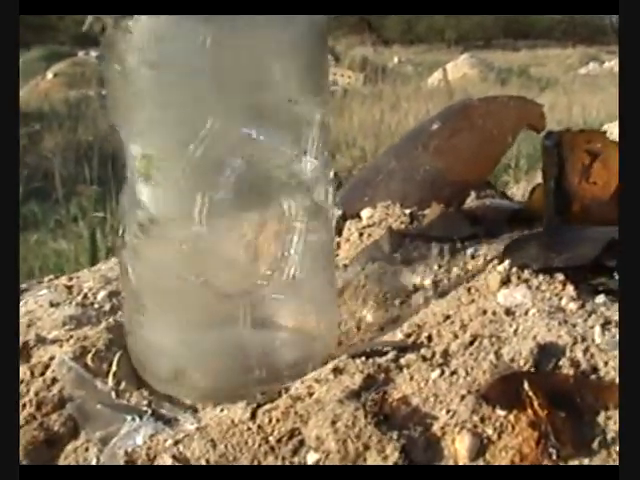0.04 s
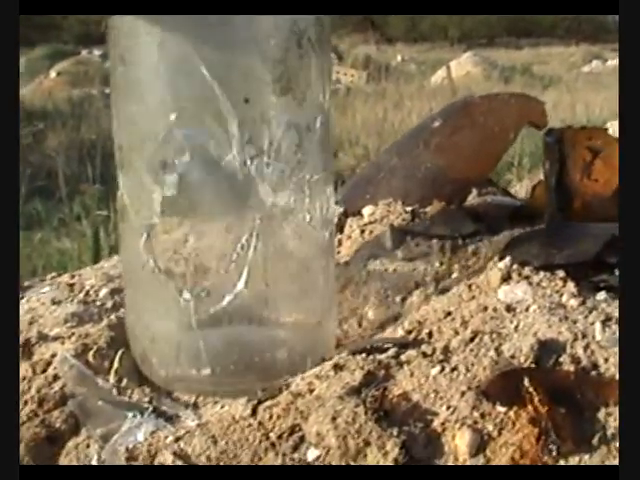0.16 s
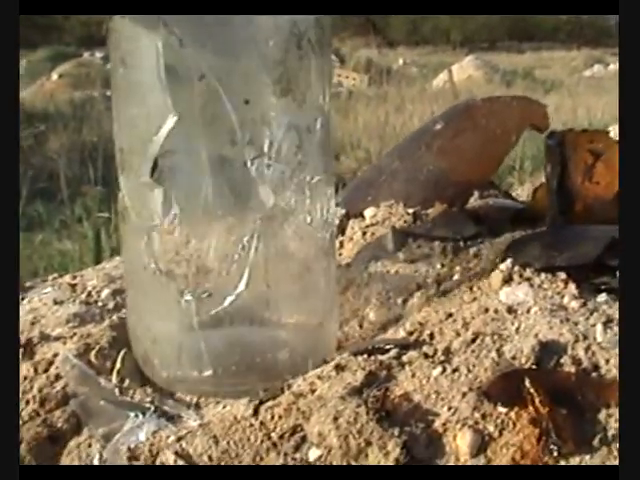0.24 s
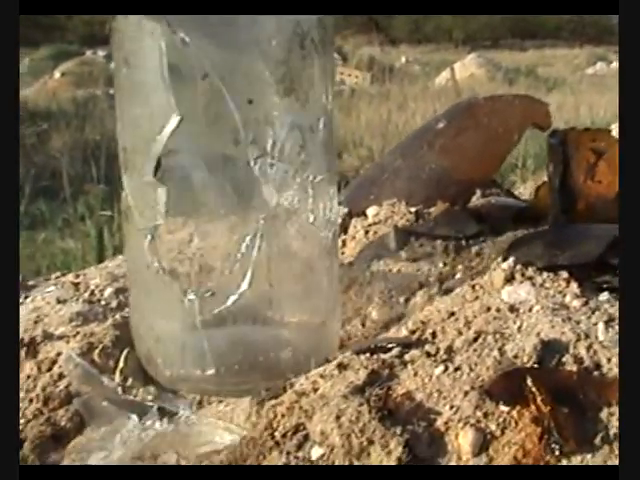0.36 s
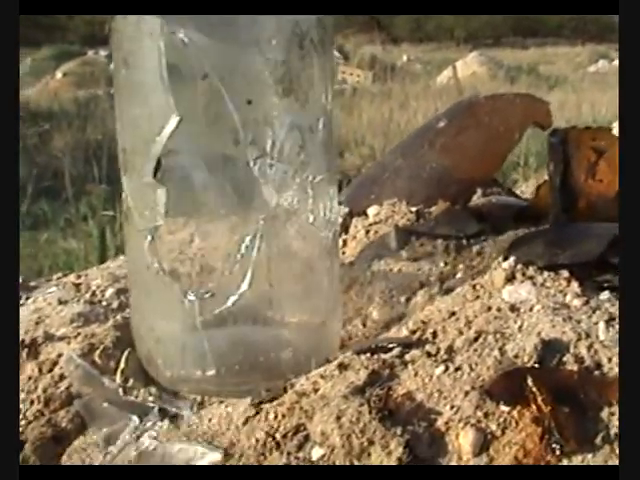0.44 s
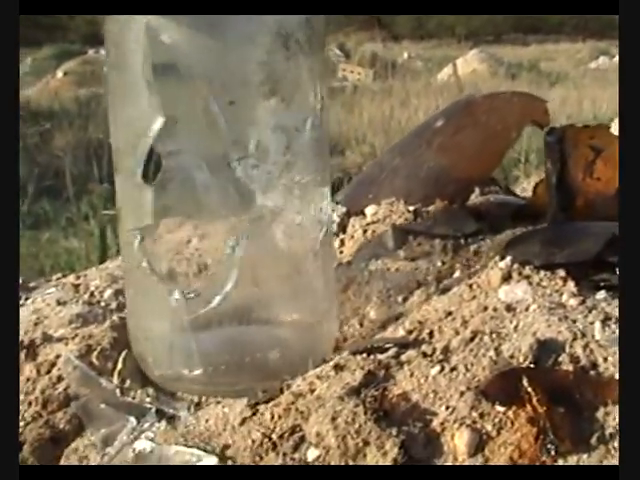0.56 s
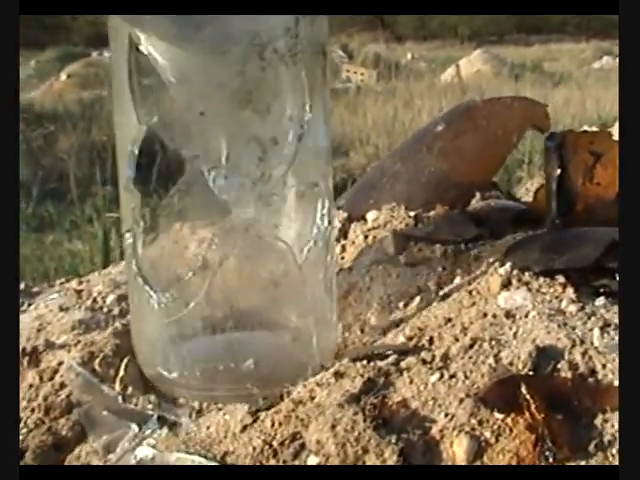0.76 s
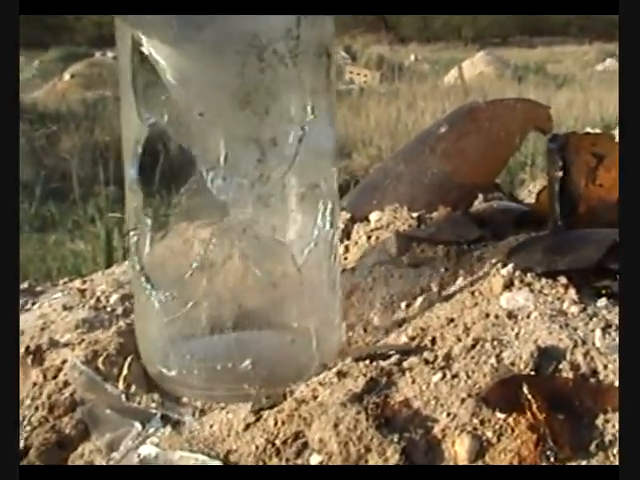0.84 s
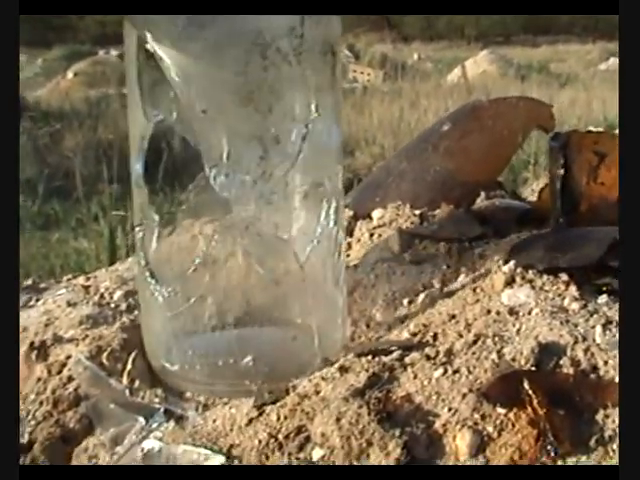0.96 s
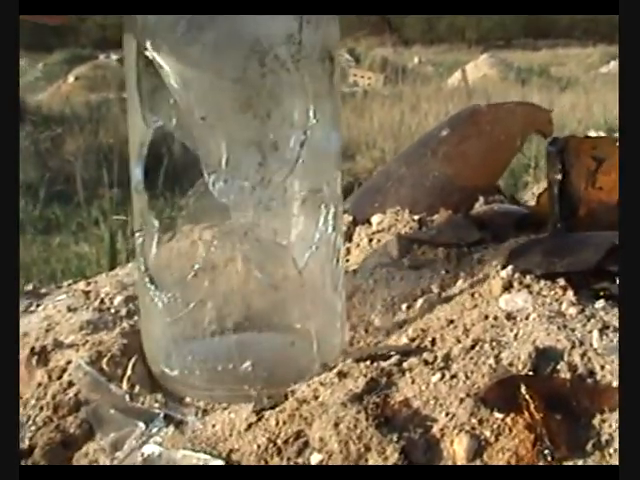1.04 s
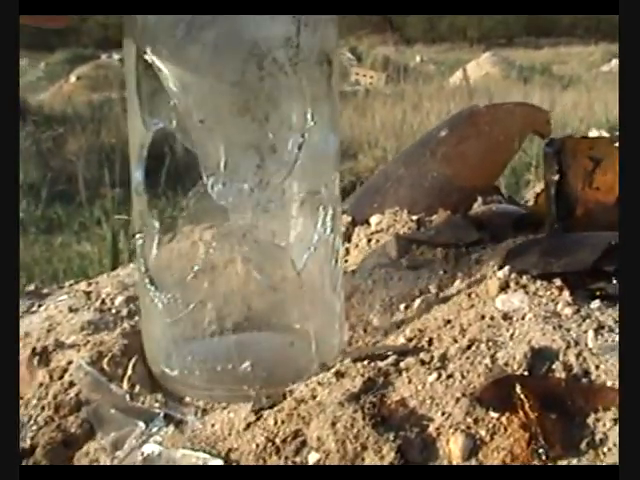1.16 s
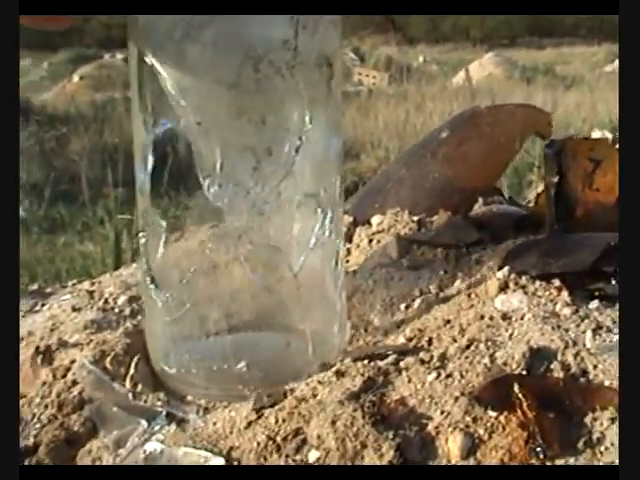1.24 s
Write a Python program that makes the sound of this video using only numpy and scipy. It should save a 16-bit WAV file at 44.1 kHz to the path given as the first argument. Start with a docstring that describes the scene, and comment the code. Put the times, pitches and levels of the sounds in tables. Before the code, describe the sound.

Cracked glass jar shifts on a gritty heap, knocking hollowly and crunching before its edges crack, squeak and snap hard; small scrapes and ticks follow. Close microphone in open air, no echo, very faint wind rumble.

```python
"""Cracked glass jar ground into sand

A cracked glass jar is pressed and turned on a heap of sand outdoors, close by and a little to the left.
Clicks and grinding ring its hollow modes; its edges crack in noise bursts, squeal as a wavering sine and snap.
It scrapes to rest with a few ticks of grit. Crunch and spray are random clicks, thuds and pings damped sines.
Faint wind, made of filtered noise, lies underneath."""
import sys
import numpy as np
from scipy import signal
from scipy.fft import rfft, irfft
from scipy.io import wavfile

SR = 44100
rng = np.random.default_rng(int(sys.argv[2]) if len(sys.argv) > 2 else 0)


def to_wav(s):
    """Save 16-bit WAV."""
    ch = np.atleast_2d(s).T  # columns
    pcm = np.round(np.clip(ch, -1, 1) * 32767)  # PCM
    wavfile.write(sys.argv[1], SR, pcm.astype(np.int16))


N = 57330
TIME = np.arange(N) / SR   # seconds

# Jolts of the jar on the grit. Each row: start in seconds, relative level in dB, brightness in dB per octave,
# boost of the middle modes in dB, set by where it touches.
KNOCKS = [(0.2219, -35.0, 9, 17), (0.2286, -27.5, 4, 11), (0.24, -32.5, 24.5, 17.5), (0.2422, -23, -1, -26),
          (0.2519, -13.5, -9, -20), (0.2618, -36, 0, 7.5), (0.275, -26, -17, -17), (0.2905, -31, -5.5, 6.5),
          (0.3252, -20.5, -4.5, -24), (0.3451, -10, -6.5, -41), (0.3556, -19.5, -6, -6),
          (0.368, -9, -15.5, -35), (0.3743, -26, -10.5, -12), (0.3843, -30, 16, 19.5),
          (0.3874, -12, -5.5, -24), (0.3961, -37, 2.0, 16), (0.4106, -25.5, 2, -9.5),
          (0.4167, -14.5, -17, -28), (0.4419, -44, 29, 3.5), (0.4862, -29.5, 2.5, -3),
          (0.5293, -11.5, 1.5, -17), (0.5573, -26.5, 7, -7), (0.5758, -21.0, 7, 3),
          (0.5918, -37.0, -27.5, -8), (0.6543, -37, -8, 13.5), (0.7457, -33.5, 3, -22),
          (0.7513, -28.5, 4, -18), (0.7811, -37.5, 4, 5), (0.8066, -45, 13, 18.5), (0.9808, -38, 15, 2),
          (0.9855, -33.5, 1.5, -11), (1.021, -31, 2, -4), (1.0388, -31.5, 3.5, -8)]
# Hollow ring of the jar. Each row: frequency in Hz, relative level in dB, t60 in seconds,
# level change in dB once the base has settled on other contacts.
JAR_MODES = [(338.0, -24, 0.02, -16), (494, -9, 0.051, -16), (554.5, -1, 0.028, 4), (668, -4.5, 0.025, 1.5),
             (757.4, -8.5, 0.028, 2), (1002, -13.5, 0.059, -7), (1040, -5.5, 0.036, 3),
             (1130, -20.5, 0.045, 0.4), (1259, -24.5, 0.17, 8.5), (1290, -34, 0.063, 27),
             (1496, -33.3, 0.035, -7), (1995, -23.5, 0.039, 0), (2248, -32.5, 0.067, 6.5),
             (3026, -26, 0.032, 7)]
# Grinding of the base on the sand. Each row: time in seconds, relative level in dB.
GRIND_LEVEL = [(0.0, -68), (0.14, -61.5), (0.205, -46.5), (0.24, -28.5), (0.275, -39.5), (0.31, -35),
               (0.385, -29.5), (0.43, -35), (0.475, -52.5), (0.56, -39.5), (0.63, -56), (0.71, -58),
               (0.81, -45), (0.87, -48.5), (0.95, -44.5), (1.04, -43), (1.11, -51), (1.3, -63.5)]
GRIND_PER_S, GRIND_SPREAD_DB, GRIND_TILT_DB_PER_OCTAVE = 1400, 2.5, 0.5
SETTLE_S, JAR_BUILD_T60_S, JAR_LOW_CUT_HZ = 0.79, 0.0034, 460
JAR_PAN_DB, JAR_PAN_DB_PER_OCTAVE, JAR_WIDTH = 12, -3, 0.089

# Glass cracks and ticks. Each row: start in seconds, relative level in dB, decay time constant in seconds,
# centre of its brightness in Hz, spread in octaves.
CRACKS = [(0.0264, -22.5, 0.0018, 8800, 0.38), (0.0552, -32, .00034, 8100, 0.89),
          (0.11, -37, 0.00087, 6860, 1), (0.2396, -24, 0.005, 2330, 0.47), (0.25, -25, 0.0028, 2300, 0.49),
          (.3445, -23, 0.0051, 2720, 1.7), (0.385, -20.5, 0.003, 5300, 0.3),
          (0.41, -31.5, .009, 3080, 0.39), (0.4909, -24, 0.0049, 2760, 0.7),
          (0.515, -16, 0.0021, 4800, 0.29), (0.5284, -8.5, 0.0038, 6660, 1.34),
          (.5447, -15, 0.00074, 8000, .5), (.5526, -13, 0.00056, 8860, 0.88),
          (.557, -10, 0.0027, 5870, 0.38), (0.5778, -6, 0.0015, 5200, 0.67),
          (0.5933, -3.5, 0.00083, 8950, 0.64), (.599, -11, 0.00061, 9700, 0.35),
          (0.6209, -13, 0.00074, 7500, 0.76), (0.6554, -25.5, 0.0011, 890, 1.5),
          (0.6626, -26, 0.00063, 6060, 1.1), (.6754, -22, 0.0023, 7800, 0.23),
          (0.7463, 4, 0.00011, 3000, 0.68), (0.7468, 1.5, 0.00035, 9100, 0.69),
          (0.7567, -12, 0.00035, 2400, .8), (0.7645, -25, 0.00034, 8500, 0.83),
          (.7725, -18.5, 0.00055, 2320, .53), (0.826, -34, 0.0051, 5000, 2),
          (0.8368, -29, .0018, 8100, 0.75), (.88, -32.5, 0.0022, 3400, 1.05),
          (0.9135, -37, 0.0059, 3000, 1.1), (0.9194, -25, 0.0012, 7000, 1.8),
          (.929, -30, 0.00088, 4800, 1.7), (0.9755, -29.5, 0.00088, 7860, 1.5),
          (0.981, -40, 0.011, 3820, 1), (1.036, -40, .004, 3600, .8), (1.146, -31.5, 0.00034, 8000, 1.5)]
# Overall colour of the cracking glass. Each row: frequency in Hz, relative level in dB.
GLASS_SPECTRUM = [(60, -14), (300, -4.5), (800, 4), (1100, 3), (1550, 2.5), (1850, -10), (2250, 0),
                  (2700, -2.5), (3600, -2.5), (5300, -6.5), (7500, -3), (10000, -5), (12500, -14.5),
                  (16000, -24)]
CRACK_SNAP_SHARE, CRACK_SKIRT_DB = 0.39, -29   # the skirt is the limit far from the centre
CRACK_TAIL_DB, CRACK_TAIL_S = -26, 0.0087   # slower second decay, time constant
GLASS_PAN_DB, GLASS_BASS_PAN_DB, GLASS_WIDTH = 2, 18, 0.34

# Squeal of edge rubbing on edge. Each row: time in seconds, relative level in dB.
SQUEAL_LEVEL = [(.54, -90), (.555, -58), (.566, -36), (.577, -30), (.580, -21), (.603, -23), (.620, -28),
                (.627, -52), (.64, -100)]
# Ring of the rubbed shards. Each row: frequency in Hz, relative level in dB, t60 in seconds.
SHARD_MODES = [(4070, 4, 0.012), (4870, 4, 0.03), (6940, 12, 0.024), (7200, -2, .018), (8240, 18.5, 0.023),
               (8900, 9, .012), (10000, 5, 0.016)]
SQUEAL_HZ, SQUEAL_WANDER_HZ, SQUEAL_FLUTTER_DB = 7793, 12, 1.2
SHARD_DB = -7   # relative to the squeal tone

# Fine splinters while the edges shear. Each row: time in seconds, relative level in dB.
SPRAY_LEVEL = [(.535, -74), (.55, -42), (.58, -40), (.62, -40), (.635, -73)]
SPRAY_LOW_CUT_HZ = 11600

# Single glass modes left ringing by a touch. Each row: start in seconds, relative level in dB,
# frequency in Hz, t60 in seconds.
PINGS = [(.252, -39, 4740, 0.038), (.411, -37.5, 3070, .033), (0.576, -22, 4280, 0.029),
         (.5775, -27, 3550, 0.019), (0.6, -22, 9680, 0.017), (.645, -42.5, 7900, 0.09),
         (.675, -42, 7760, 0.051), (.692, -45, 7900, 0.073), (.7212, -32, 7850, 0.062),
         (0.7465, -18.5, 3400, 0.0076), (0.7472, -30, 2260, 0.022), (.828, -35.5, 2300, 0.018),
         (.844, -36, 2300, 0.012), (.905, -36, 2350, 0.0096), (.9195, -40, 2180, 0.028),
         (.935, -36.5, 2300, 0.012), (1.1, -52.5, 3280, 0.072)]

# Faint squeaks of glass on sand. Each row: middle in seconds, half length in seconds,
# frequency in Hz, relative level in dB.
SQUEAKS = [(0.29, 0.0092, 6740, -47), (0.373, .009, 6800, -46), (0.41, 0.0092, 6760, -43),
           (0.445, 0.0078, 8600, -41.5)]
SQUEAK_T60_S = 0.067

# Crunch of grit and splinters. Each row: time in seconds, relative level in dB.
CRUNCH_LEVEL = [(0, -54), (.08, -75), (.21, -60), (.243, -39), (.275, -49), (.325, -53.5), (.35, -44),
                (.41, -41.5), (.475, -54), (.507, -49.5), (.535, -33.5), (.565, -41), (.595, -35.5),
                (.62, -42), (.632, -49), (.71, -59.5), (.75, -39), (.785, -58), (.93, -56), (1.08, -60),
                (1.3, -69.5)]
# Colour of the crunch. Each row: frequency in Hz, relative level in dB.
GRIT_SPECTRUM = [(200, -19), (1200, -1), (1750, -6.5), (2400, -0.5), (4000, -5), (6000, -4.5), (8000, -2.5),
                 (10000, -5), (12500, -17.5), (16000, -74)]
GRIT_PER_S, GRIT_SPREAD_DB = 3500, 3   # also used by the spray
GRIT_PAN_DB, GRIT_WIDTH = 2, 0.34

# Jar sinking into the sand. Each row: start in seconds, relative level in dB.
THUDS = [(.345, -32), (0.5774, -23), (0.747, -30.5)]
THUD_HZ, THUD_T60_S = 242, 0.0071
SAND_DB, SAND_HIGH_CUT_HZ = -18.5, 296   # muffled grinding, relative to the grinding level

# Low wind rumble. Each row: time in seconds, relative level in dB.
RUMBLE_LEVEL = [(0, -52.5), (.2, -60), (.3, -49), (.52, -65), (.6, -49), (.72, -49), (.85, -59.5),
                (1.3, -55)]
# Colour of the rumble. Each row: frequency in Hz, relative level in dB.
RUMBLE_SPECTRUM = [(20, -20), (40, -6), (55, 11.5), (75, -8), (110, -1.5), (200, -19.5), (500, -37)]
# Colour of the outdoor hiss. Each row: frequency in Hz, relative level in dB.
AIR_SPECTRUM = [(50, -12), (100, 0.5), (160, 1.5), (300, -5.5), (1000, -8), (2500, -19.5), (8000, -29.5),
                (16000, -55)]
AIR_DB, AIR_GUST_DB = -53.5, 3
WIND_PAN_DB, WIND_WIDTH = 1.5, 1

CUTOFF_HZ = 16400   # from here up the output is at least 70 dB down


def from_db(db):
    """Turn decibels into gain."""
    return 10 ** (np.asarray(db) / 20)


def rms_one(x):
    """Scale to unit rms."""
    return x / np.sqrt(np.mean(x ** 2) + 1e-20)


def gain_over_time(rows):
    """Draw a gain curve through points of seconds and dB, straight in dB."""
    return from_db(np.interp(TIME, *np.transpose(rows)))


def spectrum_db(points, hz):
    """Read a spectrum in dB along a log-frequency axis."""
    point_hz, point_db = np.transpose(points)
    return np.interp(np.log(hz), np.log(point_hz), point_db)


def coloured(x, db_at):
    """Minimum-phase filter, so nothing sounds early; db_at gives its gain in dB at each frequency."""
    size = 2 * x.shape[-1]
    hz = np.arange(size // 2 + 1) * SR / size + 1   # 1 Hz up, to keep the log finite
    cepstrum = irfft(np.log(from_db(db_at(hz))))
    # folding the cepstrum forward makes the response causal
    cepstrum[1:size // 2] *= 2
    cepstrum[size // 2 + 1:] = 0
    response = np.exp(rfft(cepstrum))
    return irfft(rfft(x, size) * response)[..., :size // 2]


def drift(rate):
    """Smooth random wander of unit rms; rate is the corner in Hz of two low-pass poles."""
    r = np.exp(-2 * np.pi * rate / SR)
    noise = rng.standard_normal(2 * N)
    return rms_one(signal.lfilter([1], [1, -2 * r, r * r], noise)[N:])


def ring(x, hz, t60):
    """Damped resonator: a unit click starts a dying sine of initial height 1."""
    r = np.exp(-np.log(1000) / (t60 * SR))
    w = 2 * np.pi * hz / SR
    return signal.lfilter([0, np.sin(w)], [1, -2 * r * np.cos(w), r * r], x + 1e-18)


def placed(mid, side, pan_db):
    """Make a stereo pair from mid and side, louder on the left by pan_db."""
    gains = from_db([[pan_db / 2], [-pan_db / 2]])
    return np.array([mid + side, mid - side]) * gains / gains.mean()


def clicks_at(s, db):
    """Put one click at each time."""
    out = np.zeros(N)
    out[(s * SR).astype(int)] = from_db(db)
    return out


def grains(per_s, spread_db):
    """Scatter random clicks, mostly small and a few large, at unit rms."""
    sizes = from_db(spread_db * np.minimum(rng.exponential(1, N), 5))
    signs = rng.choice([-1, 1], N)
    present = rng.random(N) < per_s / SR
    return rms_one(sizes * signs * present)


def jar():
    """Jolts and steady grinding ring the hollow body; it sounds thinner once it has settled."""
    s, db, tilt_db, middle_db = np.transpose(KNOCKS)
    rub_mid = grains(GRIND_PER_S, GRIND_SPREAD_DB)
    rub_side = JAR_WIDTH * grains(GRIND_PER_S, GRIND_SPREAD_DB)
    # divide out the rms gain of all the ringing modes together
    mode_power = sum(from_db(mode_db) ** 2 * t60 * SR for _, mode_db, t60, _ in JAR_MODES)
    body_gain = np.sqrt(mode_power / (4 * np.log(1000)))
    rub = np.array([rub_mid, rub_side]) * gain_over_time(GRIND_LEVEL) / body_gain
    out = np.zeros((2, N))
    for hz, mode_db, t60, settled_db in JAR_MODES:
        octaves = np.log2(hz / 700)
        tilt_octaves = min(octaves, 1)   # brightness stops growing one octave up
        middle = np.exp(-(octaves / 0.32) ** 2)
        clicks = clicks_at(s, db + tilt_db * tilt_octaves + middle_db * middle)
        mid, side = rub * from_db(GRIND_TILT_DB_PER_OCTAVE * tilt_octaves)
        pan_db = JAR_PAN_DB + JAR_PAN_DB_PER_OCTAVE * max(octaves, 0)
        force = placed(mid + clicks, side, pan_db)
        force = force * from_db(mode_db + settled_db * (TIME > SETTLE_S))
        # taking away a faster-dying copy makes each mode swell briefly, then die
        out += ring(force, hz, t60) - ring(force, hz, JAR_BUILD_T60_S)
    low_cut = signal.butter(2, JAR_LOW_CUT_HZ, "high", fs=SR, output="sos")
    return signal.sosfilt(low_cut, out)


def cracks(size=4096):
    """Each crack is one snap and a quickly dying burst of micro-fractures, with its own brightness."""
    out = np.zeros((2, N + size))
    t = np.arange(size) / SR
    for s, db, decay_s, centre_hz, octaves in CRACKS:
        envelope = np.exp(-t / decay_s) + from_db(CRACK_TAIL_DB) * np.exp(-t / CRACK_TAIL_S)
        burst = rng.choice([-1, 1], (2, size)) * envelope * np.sqrt(1 - CRACK_SNAP_SHARE ** 2)
        burst[0, 0] = CRACK_SNAP_SHARE * np.linalg.norm(envelope)   # the snap, in the mid only

        def crack_db(hz):
            """Glass colour, falling away to the skirt on both sides of the crack's centre."""
            distance = np.log2(hz / centre_hz) / (3.14 * octaves)
            return spectrum_db(GLASS_SPECTRUM, hz) + CRACK_SKIRT_DB * (1 - 1 / (1 + distance ** 2))

        start = int(s * SR)
        out[:, start:start + size] += from_db(db) * coloured(burst, crack_db)
    mid, side = out[:, :N]
    # the bass sits further left than the rest
    bass = signal.sosfilt(signal.butter(1, 1800, fs=SR, output="sos"), mid)
    return placed(bass, 0, GLASS_BASS_PAN_DB) + placed(mid - bass, GLASS_WIDTH * side, GLASS_PAN_DB)


def squeal():
    """Stick-slip between two edges drives one high mode of the glass and sets the others ringing faintly."""
    hz = SQUEAL_HZ + SQUEAL_WANDER_HZ * drift(rate=150)
    phase = 2 * np.pi * np.cumsum(hz) / SR
    flutter = from_db(SQUEAL_FLUTTER_DB * drift(rate=230))
    tone = np.sqrt(2) * np.sin(phase) * flutter
    slips = grains(per_s=1900, spread_db=2)
    shards = rms_one(sum(from_db(db) * ring(slips, mode_hz, t60) for mode_hz, db, t60 in SHARD_MODES))
    return placed(gain_over_time(SQUEAL_LEVEL) * (tone + from_db(SHARD_DB) * shards), 0, pan_db=3.5)


def spray():
    """Tiny splinters fly off the shearing edges in a dense, bright fizz of high-passed clicks."""
    low_cut = signal.butter(2, SPRAY_LOW_CUT_HZ, "high", fs=SR, output="sos")
    clicks = [grains(GRIT_PER_S, GRIT_SPREAD_DB) for _ in range(2)]
    mid, side = rms_one(signal.sosfilt(low_cut, clicks))
    return gain_over_time(SPRAY_LEVEL) * placed(mid, GRIT_WIDTH * side, 0)


def pings():
    """Touches ring single modes of the shards briefly."""
    out = sum(ring(clicks_at(np.array([s]), db), hz, t60) for s, db, hz, t60 in PINGS)
    return placed(out, 0, pan_db=3.5)


def squeaks():
    """Rapid slips on sand grains, as noise, keep a high mode of the glass going for a moment."""
    out = np.zeros(N)
    for s, half_s, hz, db in SQUEAKS:
        slips = ring(rng.standard_normal(N), hz, SQUEAK_T60_S)
        steadied = rms_one(np.tanh(rms_one(slips)))   # evens out the noisy swells
        swell = np.exp(-((TIME - s) / half_s) ** 2)
        out += from_db(db) * steadied * swell
    return placed(out, 0, pan_db=2.5)


def crunch():
    """Sand grains and splinters are crushed in dense tiny clicks."""
    def grit():
        """One channel of coloured clicks."""
        clicks = grains(GRIT_PER_S, GRIT_SPREAD_DB)
        return rms_one(coloured(clicks, lambda hz: spectrum_db(GRIT_SPECTRUM, hz)))

    mid, side = grit(), grit()
    return gain_over_time(CRUNCH_LEVEL) * placed(mid, GRIT_WIDTH * side, GRIT_PAN_DB)


def thuds():
    """The heap answers dully: damped thuds and a muffled grinding."""
    hits = ring(clicks_at(*np.transpose(THUDS)), THUD_HZ, THUD_T60_S)
    high_cut = signal.butter(2, SAND_HIGH_CUT_HZ, fs=SR, output="sos")
    muffled = rms_one(signal.sosfilt(high_cut, grains(per_s=1800, spread_db=4)))
    return placed(hits + from_db(SAND_DB) * gain_over_time(GRIND_LEVEL) * muffled, 0, pan_db=7)


def wind():
    """Low rumble on the microphone over a faint, gusting outdoor hiss, both filtered noise."""
    def noise(spectrum):
        """Mid and side noise with the given colour."""
        return rms_one(coloured(rng.standard_normal((2, N)), lambda hz: spectrum_db(spectrum, hz)))

    rumble = gain_over_time(RUMBLE_LEVEL) * noise(RUMBLE_SPECTRUM)
    air = from_db(AIR_DB + AIR_GUST_DB * drift(rate=5.0)) * noise(AIR_SPECTRUM)
    mid, side = rumble + air
    return placed(mid, WIND_WIDTH * side, WIND_PAN_DB)


def scene():
    """Sum all sources, dry in the open air."""
    return jar() + cracks() + squeal() + spray() + pings() + squeaks() + crunch() + thuds() + wind()


def record(dry):
    """Round the peaks softly, then cut the top of the spectrum."""
    top = 0.9   # ceiling of the rounding
    rounded = top * np.tanh(dry / top)
    return signal.sosfilt(signal.cheby2(12, 70, CUTOFF_HZ, fs=SR, output="sos"), rounded)


dry = scene()
out = record(dry)
to_wav(out)
```